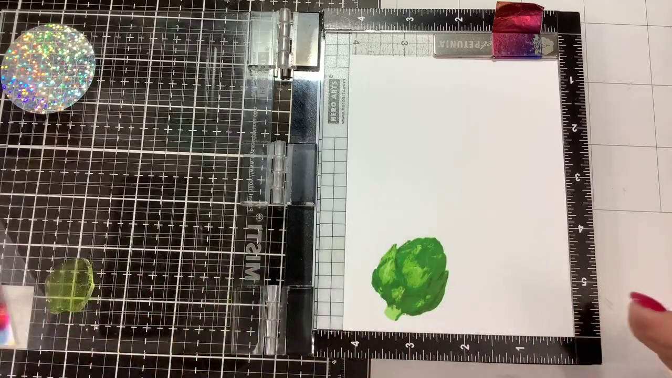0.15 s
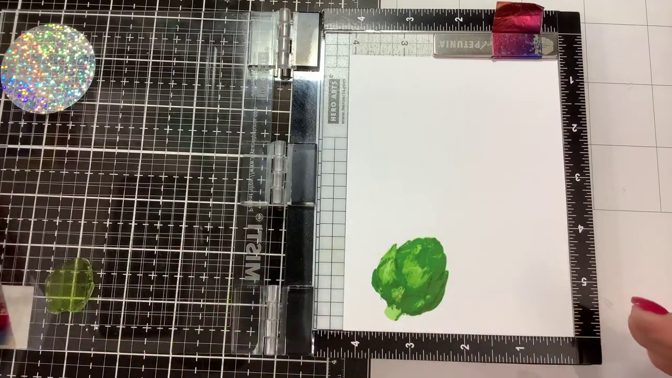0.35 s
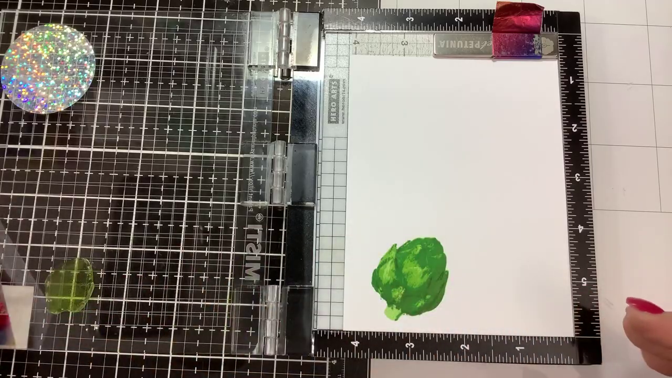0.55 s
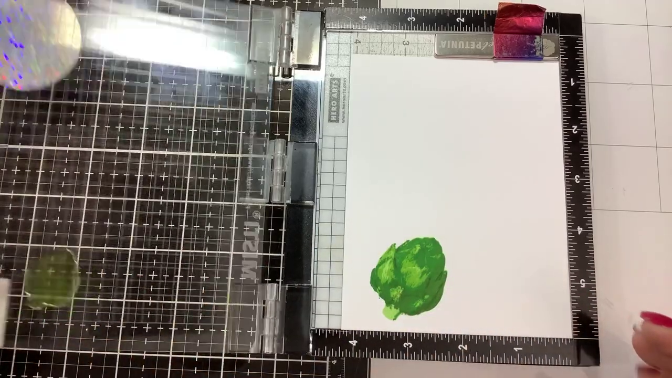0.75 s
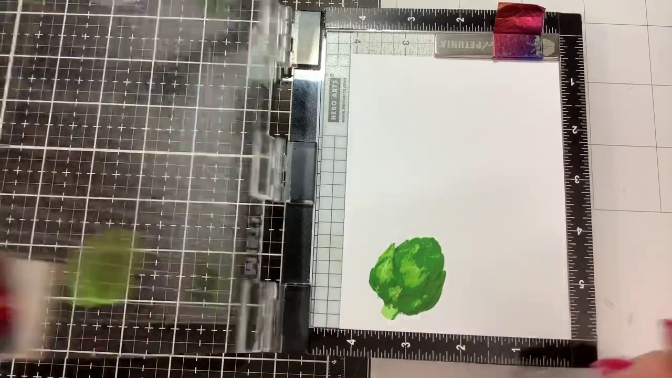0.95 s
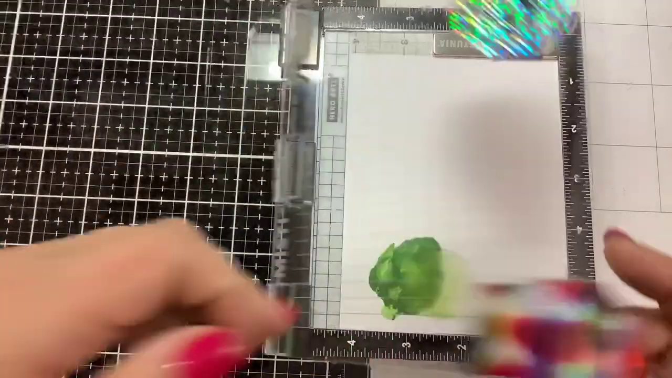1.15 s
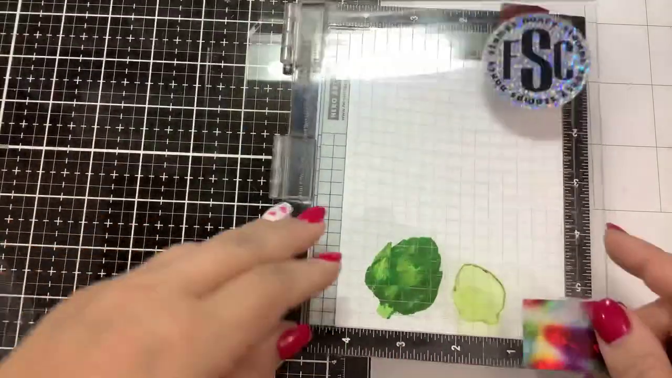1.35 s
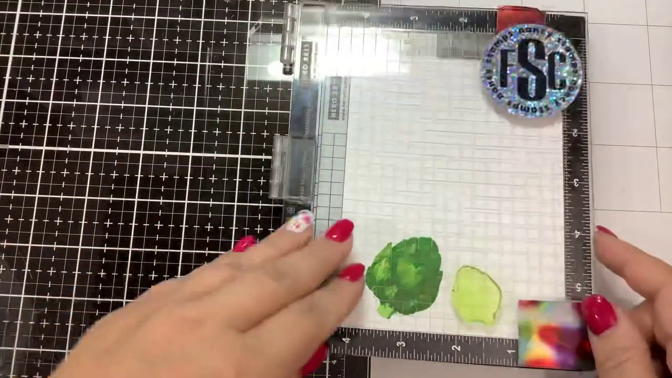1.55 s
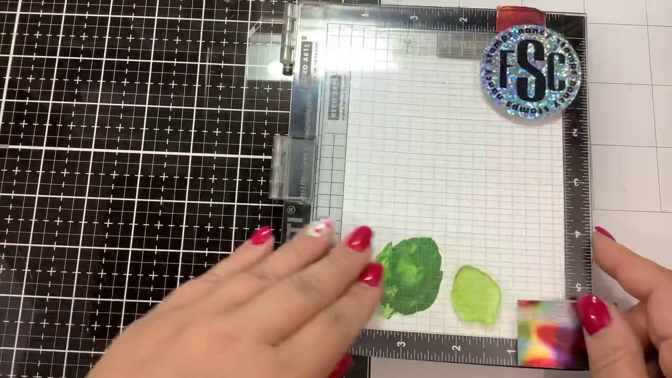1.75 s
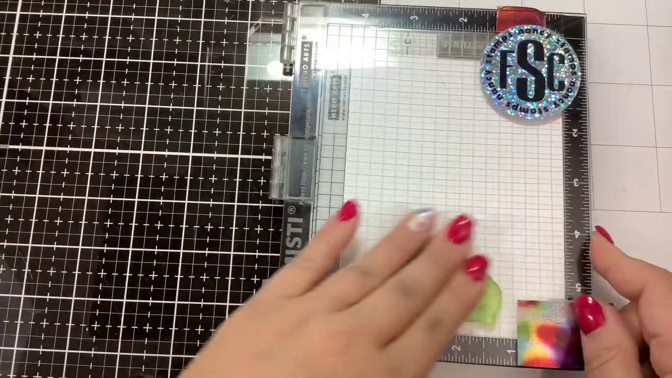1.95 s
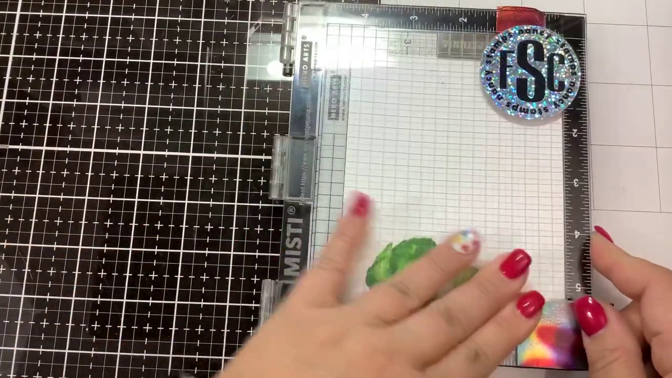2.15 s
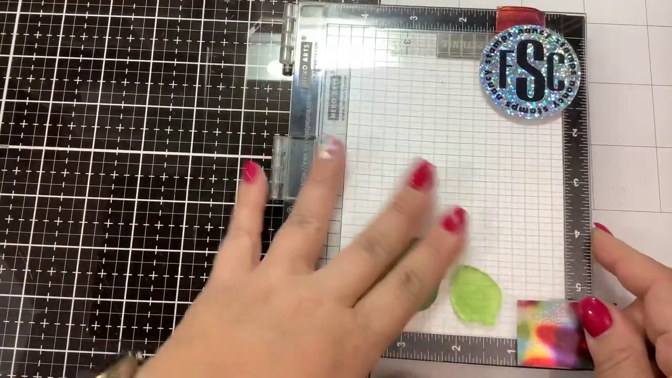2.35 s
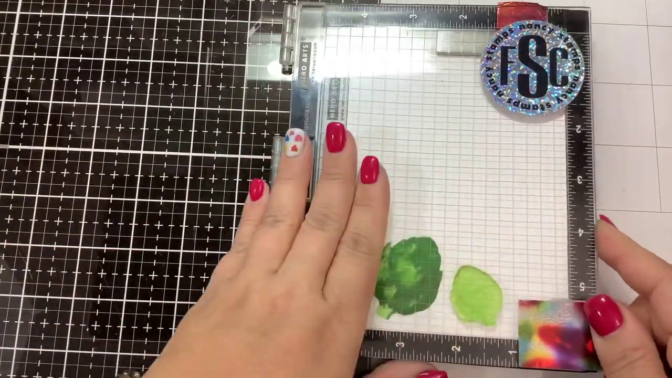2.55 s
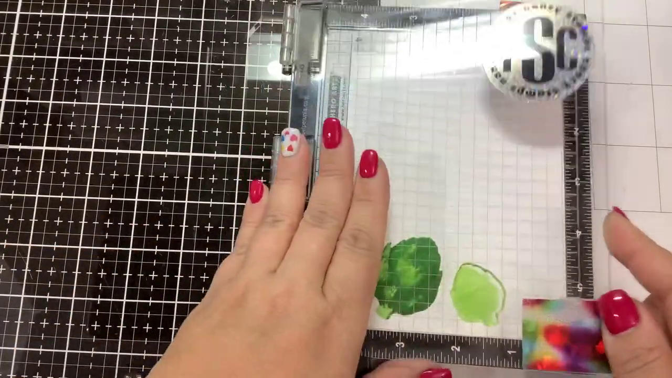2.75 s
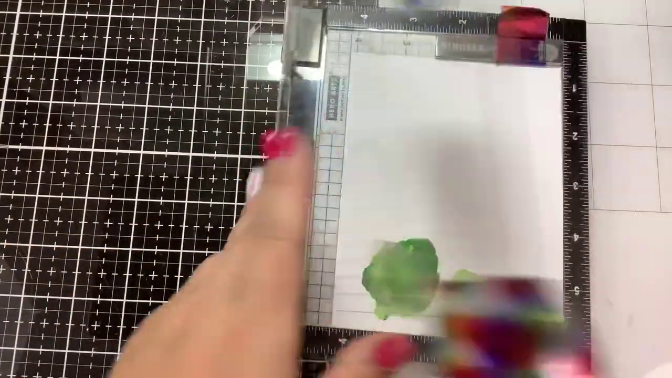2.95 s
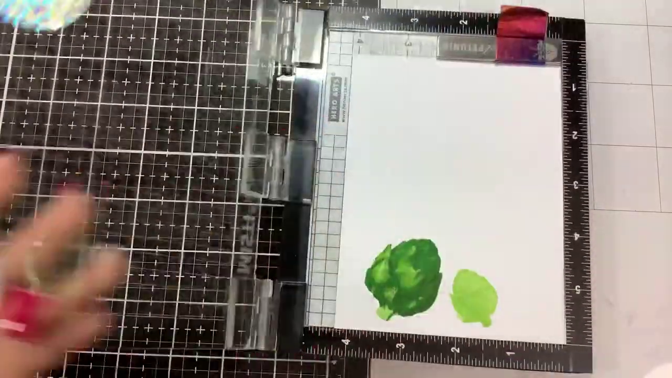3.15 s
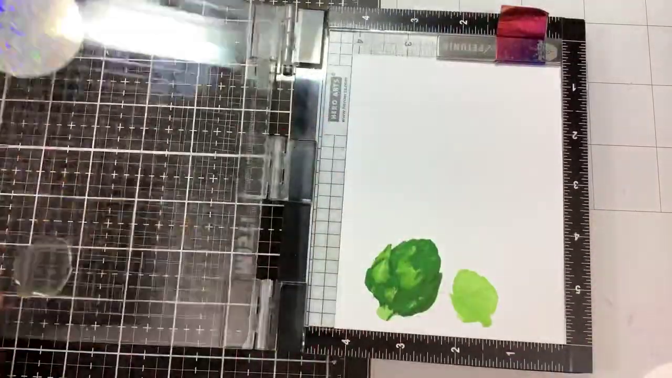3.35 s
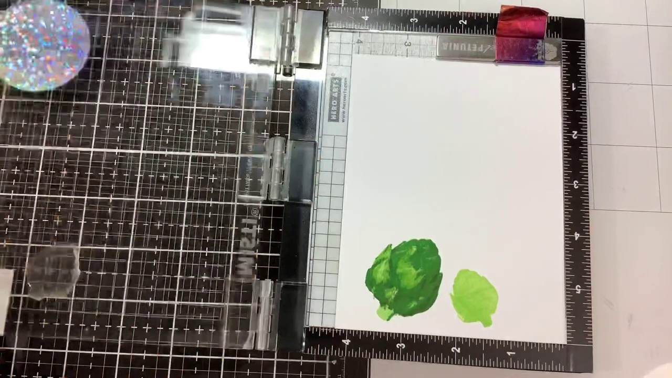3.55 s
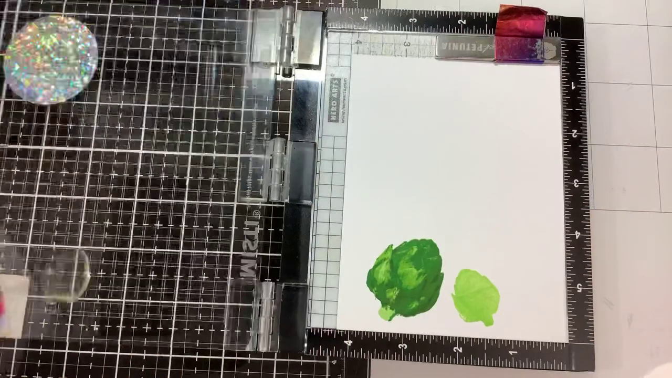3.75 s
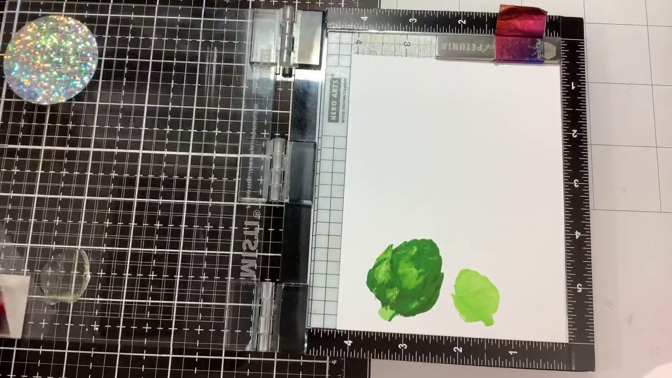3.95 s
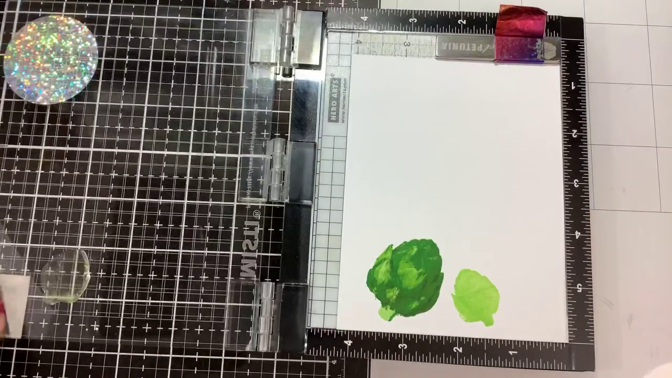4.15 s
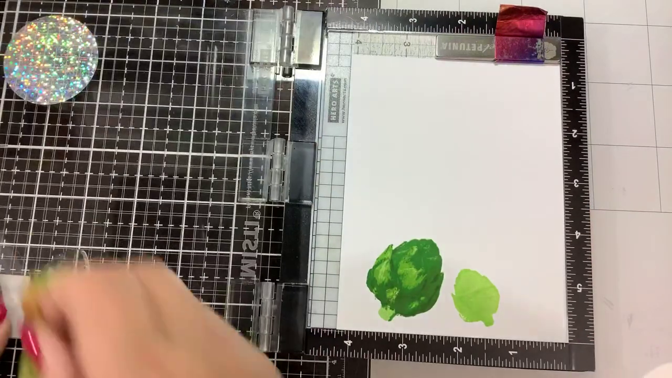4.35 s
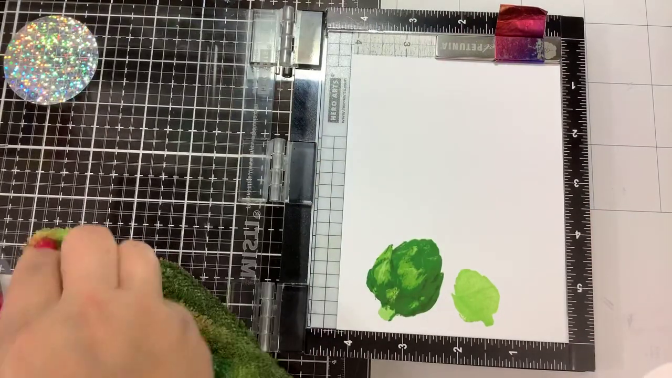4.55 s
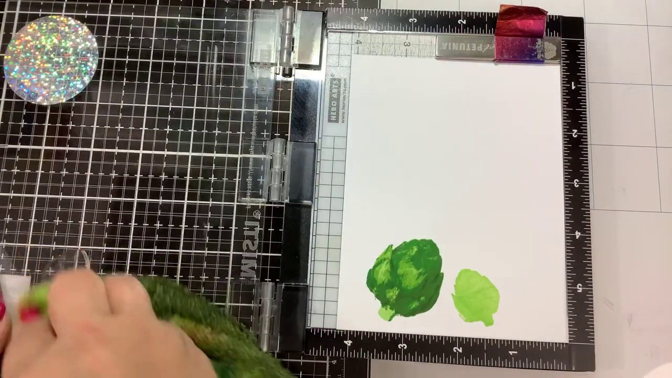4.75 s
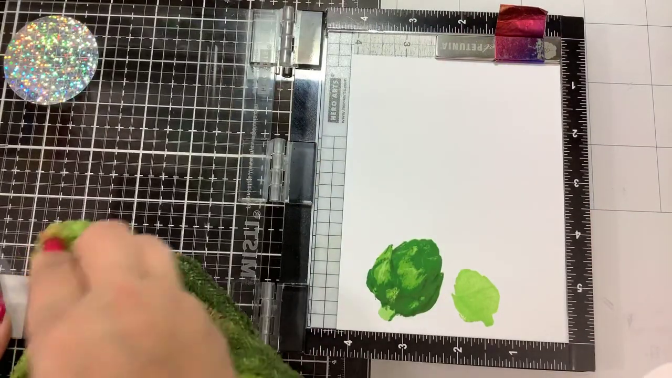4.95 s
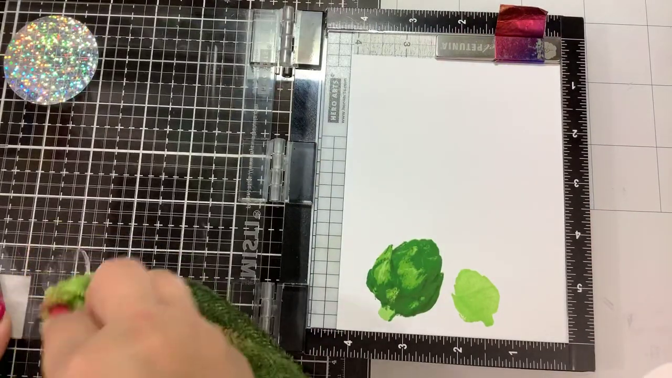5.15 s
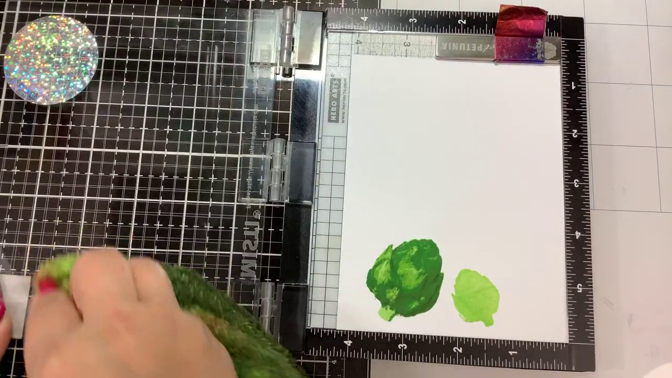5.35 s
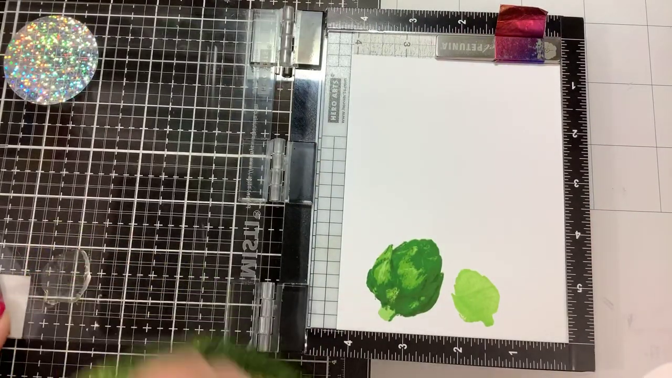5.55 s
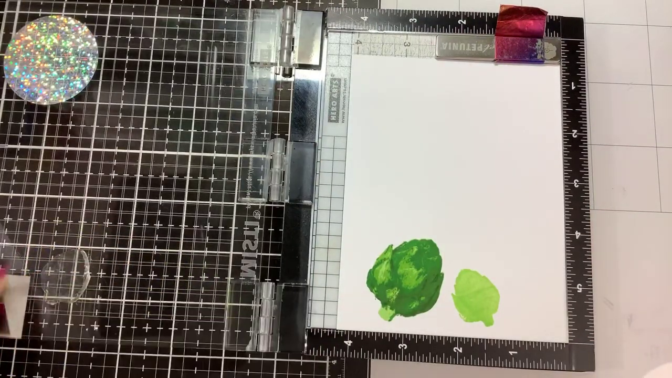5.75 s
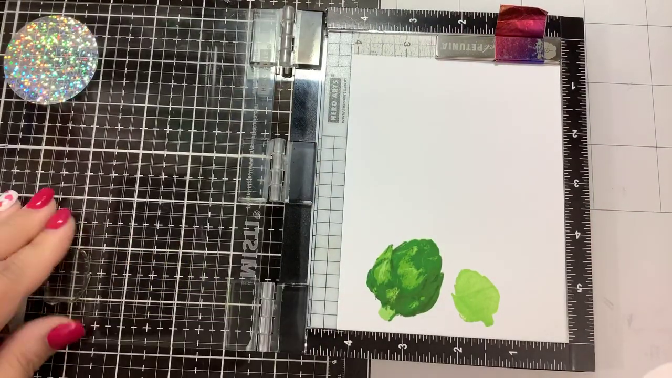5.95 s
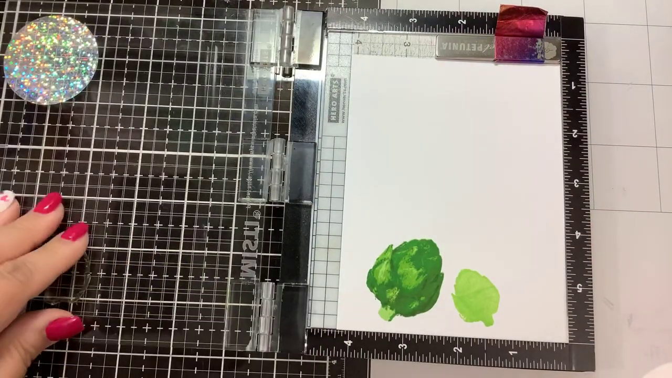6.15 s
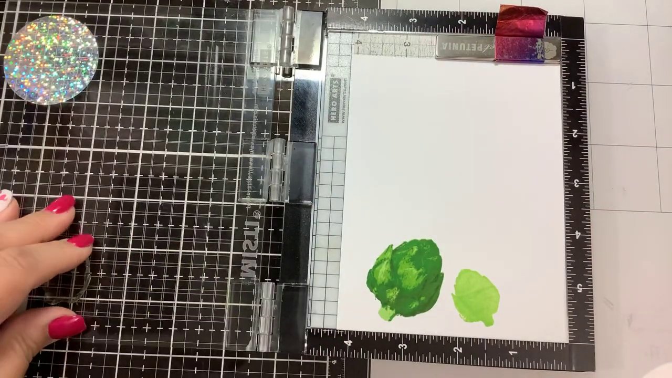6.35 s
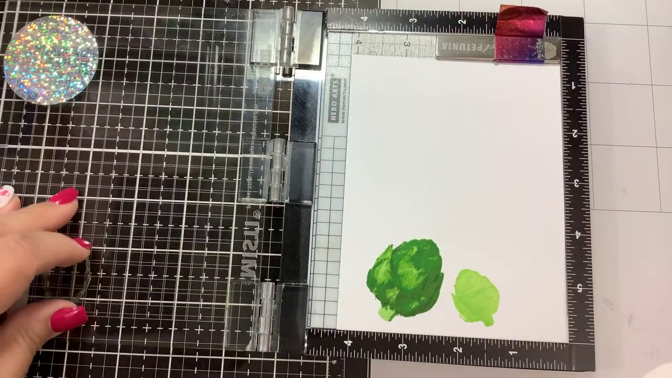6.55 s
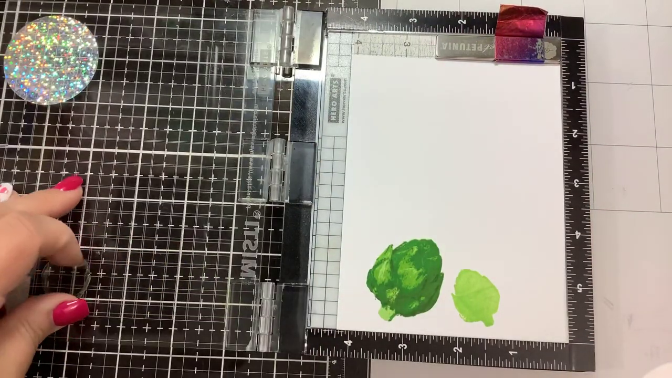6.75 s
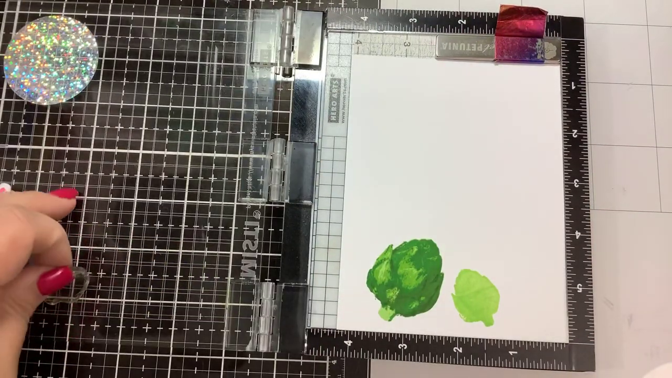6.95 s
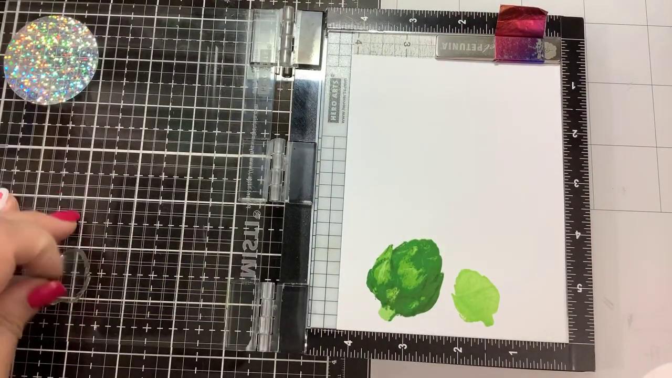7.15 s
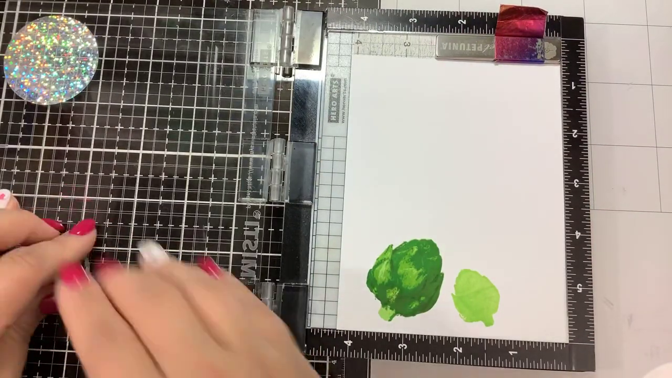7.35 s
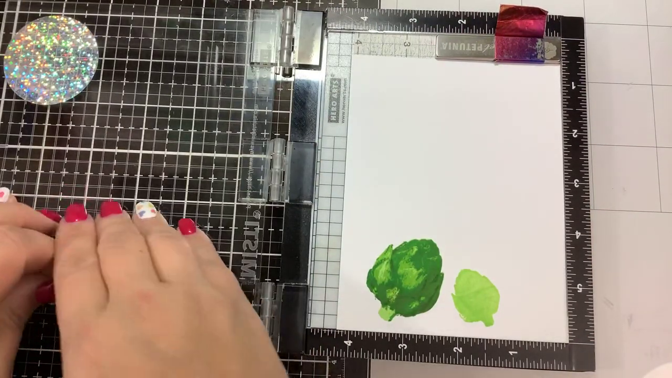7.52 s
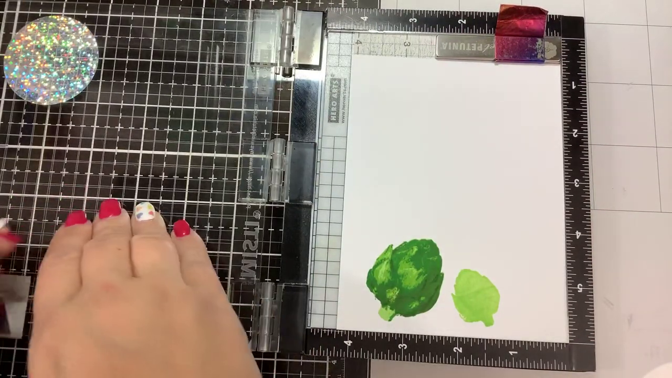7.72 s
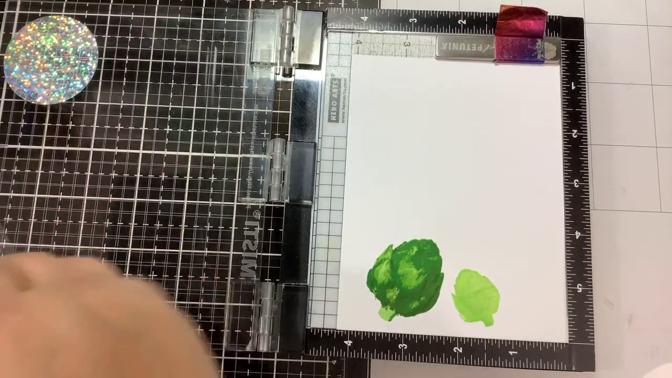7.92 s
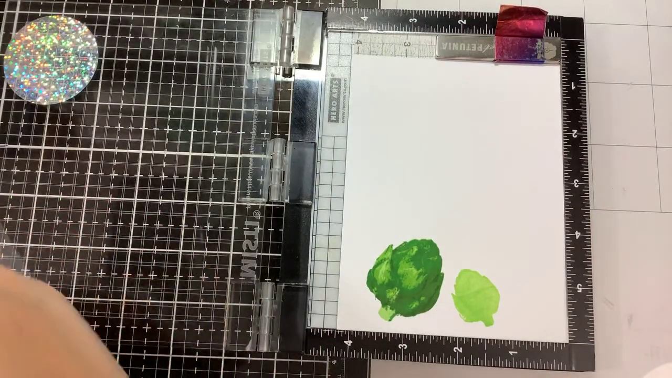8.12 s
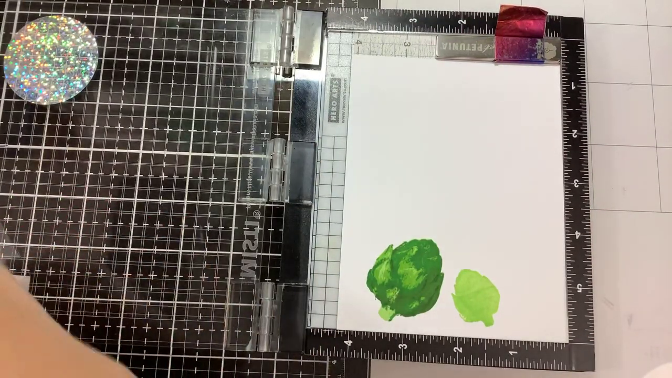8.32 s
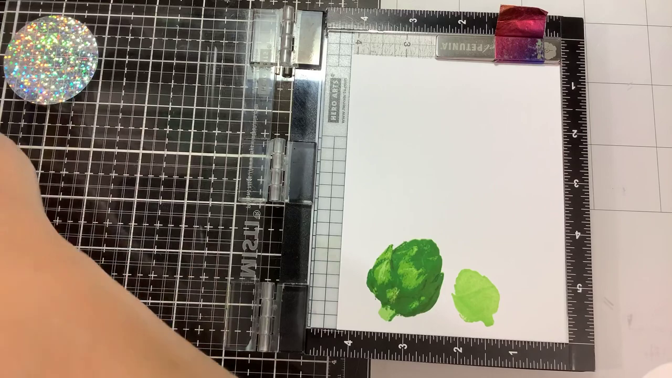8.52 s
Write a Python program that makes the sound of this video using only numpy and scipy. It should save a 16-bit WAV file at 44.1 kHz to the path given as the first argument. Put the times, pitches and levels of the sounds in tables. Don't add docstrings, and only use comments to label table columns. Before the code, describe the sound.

A small, dry room, heard very close, with faint mains hum, ventilation rumble, a weak whine and hiss throughout. At 0.1 s a plastic plate lands with a loud hard clack; a crisp snap follows at 0.35. From 0.6 to 0.95 the dry hinge pings, grates and ticks rapidly, then a bright snap with a desk thud at 1.13. Until 2.9 come soft fingertip taps, cloth rustle, a short rubbing drag near 2.1 and a duller snap at 2.56. At 3.0 the hinge squeals briefly, a sharp double snap hits at 3.15, and uneven ratcheting ticks run to a knock at 3.7. From 4 to 6 there is sparse, quiet wiping and tapping, with a small ping at 5.7. A tiny falling fingertip squeak at 6.1 leads into low desk creaks until 6.9. A woody knuckle rap at 7.03, a loud hard flick at 7.27, scattered nail taps to 7.8, then near quiet.

```python
import sys
import numpy as np
from scipy import signal
from scipy.fft import rfft, irfft
from scipy.io import wavfile
from scipy.ndimage import uniform_filter1d

SR = 44100
rng = np.random.default_rng(int(sys.argv[2]) if len(sys.argv) > 2 else 0)


def master_out(mix):
    frames = np.transpose(np.atleast_2d(mix))
    ceiling = np.clip(frames, -1, 1)
    pcm = np.round(ceiling * 32767).astype(np.int16)
    wavfile.write(sys.argv[1], SR, pcm)


def amplitude_ratio(level_db):
    exponent = np.asarray(level_db, float) / 20
    return 10 ** exponent


N = 382788


def rms_one(x):
    return x / np.sqrt(np.mean(x ** 2) + 1e-20)


def in_time(rows):
    s, *columns = np.transpose(rows)
    return [np.interp(np.arange(N) / SR, s, c) for c in columns]


def during(rows):
    first, last = rows[0][0], rows[-1][0]
    inside = np.abs(np.arange(N) / SR - (first + last) / 2) < (last - first) / 2
    return uniform_filter1d(1. * inside, size=220)


def band(x, low, high):
    return signal.sosfilt(signal.butter(2, [low, high], "band", fs=SR, output="sos"), x)


def resonate(x, hz, width):
    r = np.exp(-np.pi * width / SR)
    return signal.lfilter(np.array([1, 0, -1]) * (1 - r * r) / 2, [1, -2 * r * np.cos(2 * np.pi * hz / SR), r * r], x)


def drift(rate):
    r = np.exp(-80 * np.pi * rate / SR)
    slow = signal.lfilter([1], [1, -2 * r, r * r], rng.standard_normal(N // 40 + 2002))[2000:]
    return np.interp(np.arange(N) / 40, np.arange(len(slow)), rms_one(slow))


def coloured(spectrum):
    hz, level_db = np.transpose(spectrum)
    grid = np.maximum(np.fft.rfftfreq(N, 1 / SR), 1)
    gain = amplitude_ratio(np.interp(np.log(grid), np.log(hz), level_db))
    return rms_one(irfft(rfft(rng.standard_normal(N)) * gain, N))


def body(x, modes, ring_db):
    ringing = sum(amplitude_ratio(db) * resonate(x, hz, w) * (-1) ** k for k, (hz, w, db) in enumerate(modes))
    return x + amplitude_ratio(ring_db) * ringing


def grains(per_s, spread_db):
    sizes = amplitude_ratio(spread_db * np.minimum(rng.exponential(1, N), 4)) * rng.standard_normal(N)
    return rms_one(sizes * (rng.random(N) < per_s / SR))


# (lower edges [Hz]), (upper edges [Hz])
BAND_EDGES = [1400, 430, 4000, 8000], [4000, 1400, 8000, 16500]
CREST = [8, 5, 8]


def contacts(rows, modes, ring_db, ms=2.2, echo_db=0, click=6.54, alike=0):
    out, t = np.zeros(N + 8192), np.arange(8192) / SR
    room_t60_s, room_db = 0.09, -11
    late_t60_s, late_db = 0.23, -34
    tails = amplitude_ratio(room_db + echo_db - 60 * t / room_t60_s) + amplitude_ratio(late_db + echo_db - 60 * t / late_t60_s)
    echoes = tails * np.clip(t / 0.00073 - .5, 0, 1)
    treble_loss = amplitude_ratio(-245.5 * t)
    usual = rng.standard_normal(8192)
    for s, peak_db, dull_db, bright_db, top_db, *own_ms in rows:
        decay_ms = [ms, *own_ms][-1]
        shape = np.exp(-t * 1000 / decay_ms) * np.minimum(t / 0.00016, 1) + echoes
        struck = [(hz, w, db + 1.5 * rng.standard_normal()) for hz, w, db in modes]
        force = (alike * usual + np.sqrt(1 - alike ** 2) * rng.standard_normal(8192)) * shape
        force[8] += click
        rung = body(force, struck, ring_db)
        parts = [sign * band(rung, low, high) for sign, low, high in zip([1, -1, -1, 1], *BAND_EDGES)]
        parts[2:] = treble_loss * parts[2:]
        parts[1] = np.interp(t - 0.0012, t, parts[1], left=0)
        weights_db = [0, *(np.array([dull_db, bright_db, top_db]) + CREST)]
        at = round(s * SR)
        for db, part in zip(weights_db, parts):
            out[at:at + 8192] += amplitude_ratio(peak_db + db) * part / np.abs(part).max()
    return out[:N]


# (frequency [Hz], level [dB per Hz])
FLOOR_SPECTRUM = [(12, -19), (20, -11), (32, -7.5), (43, -1), (65, -2.5), (128, -4.5), (189, -18),
                  (265, -18.5), (297, -16.5), (440, -22), (1080, -42), (1240, -23.5), (3060, -43),
                  (15800, -26)]
# (frequency [Hz], width [Hz], level [dB rms])
MAINS_HUM = [(60.4, 11, -57), (128, 6.5, -77.5)]


def background():
    hum = 0
    for hz, width, db in MAINS_HUM:
        hum = hum + amplitude_ratio(db) * rms_one(resonate(resonate(rng.standard_normal(N), hz, width), hz, width))
    whine_hz = 295.7 + .8 * drift(1.9)
    whine = amplitude_ratio(-65 + 1.8 * drift(4)) * np.sin(2 * np.pi * np.cumsum(whine_hz) / SR)
    return amplitude_ratio(-56.5) * coloured(FLOOR_SPECTRUM) + hum + whine


def lamp():
    ticks = np.diff(np.floor(np.arange(N + 1) * 120.015 / SR))
    return amplitude_ratio(-78) * rms_one(band(ticks, 10500, 11900))


# (frequency [Hz], width [Hz], level [dB])
DESK_MODES = [(650, 110, -4), (1150, 37, 1), (1770, 130, -22), (3140, 220, -28.5)]
# (frequency [Hz], level [dB per Hz])
RUSTLE_SPECTRUM = [(880, -13.5), (1500, -46.5), (1740, 7), (2070, 0.5), (2430, 0), (15800, 0.5)]
# (time [s], motion [dB], weight on the plate [dB])
HAND_MOVES = [(0, -59.5, -58.5), (0.31, -64, -79.5), (0.58, -55, -66.5), (0.95, -66, -76),
              (1.22, -63.5, -67.5), (1.82, -62.5, -70.5), (2.13, -55, -65.5), (2.37, -60.5, -71),
              (2.67, -62, -64), (3.0, -60, -70.5), (3.76, -61, -72), (4.26, -57, -67.5), (5.12, -62.5, -70),
              (5.54, -58.5, -67), (6.2, -63.5, -71), (6.55, -67, -63), (7.0, -63.5, -68.5),
              (8.68, -63, -73.5)]
# (start [s], hold [s], level [dB])
DRAGS = [(2.03, 0.033, -53), (2.099, 0.038, -34), (2.281, 0.0033, -46), (1.884, 0.079, -60),
         (2.185, 0.055, -62), (2.503, 0.023, -62.5), (2.573, 0.047, -50), (2.679, 0.022, -54),
         (2.764, 0.031, -53.5), (4.09, 0.027, -72), (6.657, 0.11, -77)]


def rubbing():
    flicker_db = 1.5 * np.array([drift(25), drift(25), drift(12)])
    skin = rms_one(band(body(grains(4000, spread_db=2.0), DESK_MODES, ring_db=12), 450, 2500))
    rumble = rms_one(band(band(rng.standard_normal(N), 100, 250), 90, 260))
    layers = amplitude_ratio(flicker_db - 0.5) * [skin, coloured(RUSTLE_SPECTRUM), rumble]
    motion_db, weight_db = in_time(HAND_MOVES)
    rumble_db = -66.5 + 2.3 * (weight_db + 69)
    levels_db = np.array([weight_db, motion_db, rumble_db])

    grit = grains(2500, spread_db=2.5)
    drag = rms_one(resonate(resonate(grit, 590, 740), 1220, 210) + 0.047 * band(grit, 290, 4400))
    t, slope = np.arange(N) / SR, 900
    press = 0
    for s, hold, db in DRAGS:
        away = np.clip(s - t, 0, 1) + np.clip(t - s - hold, 0, 1)
        press = press + amplitude_ratio(db - slope * away)
    return np.sum(amplitude_ratio(levels_db) * layers, axis=0) + press * drag


# (time [s], peak [dB], dull band [dB], bright band [dB], top band [dB], contact [ms])
SET_DOWN_HITS = [
    (0.0808, -2, -16.5, -10, -10.5, 0.6),
    (0.0843, -10.5, -18.5, -2.5, -12.5, 1.0),
]
# (frequency [Hz], width [Hz], level [dB])
LANDING_MODES = [(620, 42, -11.5), (1040, 94, -2), (1170, 110, -0.5), (1750, 170, 4.5), (2020, 170, 4),
                 (2890, 170, 1), (3070, 150, -6), (4360, 200, -5.5), (4580, 170, -5), (6287, 500, -2)]
FADING_KNOCK = [
    (0.0002, -34, -6.5, -5, -16, 12),
]
# (frequency [Hz], width [Hz], level [dB])
FADING_KNOCK_MODES = [(631, 80, -0.5), (2170, 70, 4), (2330, 70, 0), (2390, 70, 0.5), (6013, 150, -7)]


def set_down():
    fading = contacts(FADING_KNOCK, FADING_KNOCK_MODES, ring_db=15.0, click=.1)
    return fading + contacts(SET_DOWN_HITS, LANDING_MODES, ring_db=11, echo_db=-1.5, click=11.0)


# (time [s], peak [dB], pitch [Hz], t60 [s])
DESK_THUDS = [(0.088, -33.5, 208.5, 0.076), (0.352, -48, 196, 0.059), (0.886, -48.5, 183, 0.11),
              (1.139, -40, 197.7, 0.16), (1.153, -36.5, 167.3, 0.087), (2.109, -39.5, 207, 0.085),
              (2.592, -41, 126, 0.051), (3.161, -27.5, 147.2, 0.1), (3.715, -42.5, 136.3, 0.17),
              (5.397, -41.5, 112.4, 0.037), (6.235, -54.5, 146, 0.13), (6.44, -58.5, 160.5, 0.43),
              (6.551, -55, 178.5, 0.41), (7.033, -42.5, 212, 0.1), (7.44, -47.5, 190, 0.057),
              (7.619, -41, 170.6, 0.085)]
# (time [s], peak [dB], pitch [Hz], t60 [s])
DESK_SWAYS = [
    (1.155, -38.5, 65, 0.13),
    (3.172, -46, 73.6, 0.15),
    (3.732, -40.5, 55, 0.12),
]


def thuds():
    out, t = np.zeros(N + 8192), np.arange(8192) / SR
    swell = 1 - np.exp(-t / .004)
    for s, peak_db, hz, t60 in [*DESK_THUDS, *DESK_SWAYS]:
        partials = [(1, 0.96), (1.45, 0.45), (2.3, .25)]
        swing = sum(share * np.sin(2 * np.pi * ratio * hz * t) for ratio, share in partials)
        at = round(s * SR)
        out[at:at + 8192] += amplitude_ratio(peak_db + 11.0 - 60 * t / t60) * swell * swing
    return out[:N]


# (time [s], peak at 1.4-4 kHz [dB], dull band [dB], bright band [dB], top band [dB])
MAGNET_SNAPS = [
    (0.3468, -21, -14, -6, 2),
    (1.1318, -13, -10.5, 6, -1.5),
    (1.7764, -28.5, -17, -60, -3),
    (2.5591, -20, -21.5, -22, -0.5),
    (3.1501, -15, -11, 3.5, 7.5),
    (3.1535, -17, -13, 3.5, 3),
]
# (frequency [Hz], width [Hz], level [dB])
MAGNET_MODES = [(1220, 300, -7), (4965, 400, -1), (5720, 600, 3.5), (8300, 500, -6)]


def magnet_snaps():
    return contacts(MAGNET_SNAPS, MAGNET_MODES, ring_db=3, ms=0.9, echo_db=-2.0, click=8.0)


# (time [s], peak [dB], dull band [dB], hardness [dB])
SHORT_TAPS = [(0.402, -46, -10, -5), (0.4339, -38.5, -15, -15), (1.3887, -51.5, 4.5, -10),
              (1.5229, -46, -31.5, -3), (1.5429, -36.5, -33, -21), (1.6791, -49.5, -5.5, -18),
              (1.714, -52.5, -5.5, -14.5), (1.9175, -44, -20, -2.5), (1.9894, -37.5, -8.5, -8.5),
              (2.0084, -44.5, -5, -16), (2.0682, -49, -17, -8), (2.086, -36.5, -14, -3.5),
              (2.2059, -52, -13, -3), (2.49, -47.5, -23, 1.5), (2.593, -49, -26, -6),
              (2.843, -50, -30, 1), (2.2827, -56.5, 11.5, -10), (2.363, -37.5, -12, -9),
              (2.5734, -29, -21, -14), (2.6075, -30.5, -24, -29), (2.6863, -33.5, -9, -15.5),
              (2.7294, -57, 6, -11),
              (4.1763, -34.5, -30, -31), (4.275, -55, 0, -20), (4.688, -43.5, -12, -3),
                (4.719, -51.5, -7, -15), (4.8862, -44, -11, -19), (5.2133, -44.5, -13, -25),
                (5.365, -50, -10, -1.5), (5.40, -57, -11.5, 7.5), (5.557, -51, 2.5, -3),
                (6.6315, -50.5, -4, 4), (6.84, -61, -4, 16), (6.89, -61.5, -14, -12),
                (6.946, -47.5, -18, 1), (7.356, -50.5, -22.5, -2), (7.4285, -53.5, 7, 3),
                (7.4984, -37, -32, -6.5), (7.5542, -40.5, -8, 1.5), (7.567, -31.5, -17, -3.5),
                (7.7745, -36, -28, -5), (7.783, -42, -14, -9), (8.599, -42.5, -10.5, -9.5)]
# (time [s], peak [dB], dull band [dB], hardness [dB])
DRAGGED_TAPS = [
    (7.4528, -34, -37, -4),
    (7.5885, -33, -13.5, -1),
    (7.8143, -31.5, -46, -5),
]


def finger_taps():
    def touches(rows):
        return [(s, db, dull_db, -5.5 + hard_db, 1.5 + hard_db) for s, db, dull_db, hard_db in rows]

    short = contacts(touches(SHORT_TAPS), DESK_MODES, ring_db=-6.0, ms=2.46)
    return short + contacts(touches(DRAGGED_TAPS), DESK_MODES, ring_db=-3.0, ms=6.2)


# (start [s], length [s], level [dB], brightness [dB])
BRUSH_STROKES = [(0.477, 0.1, -53, 1.5), (0.871, 0.03, -44, 0.5), (1.407, 0.058, -54.5, -1.5),
                 (1.519, 0.046, -53, 6.5), (2.33, 0.17, -60.5, -0.5), (2.55, 0.083, -56, -10),
                 (2.761, 0.08, -51.5, 0.5), (4.076, 0.059, -51, -3), (4.208, 0.049, -49, -0.5),
                 (4.37, 0.058, -61, 6), (4.489, 0.038, -58.5, -5.5), (4.515, 0.097, -70.5, -11.5),
                 (5.533, 0.082, -59.5, 0), (6.316, 0.12, -70.5, -7.5), (7.342, 0.036, -63, -4),
                 (7.628, 0.073, -62.5, 5), (5.685, 0.05, -45, -3.5), (6.077, 0.049, -66.5, -8),
                 (6.4, 0.24, -63.5, -2.5), (6.736, 0.054, -56.5, -3), (7.544, 0.093, -50, 0),
                 (7.777, 0.042, -56.5, -0.5)]


def strokes():
    grit = grains(6000, spread_db=2.0)
    low, mid, top = (rms_one(band(grit, a, b)) for a, b in [(700, 3060), (2500, 8160), (7000, 14000)])
    out = np.zeros(N)
    for s, length, level_db, bright_db in BRUSH_STROKES:
        at = slice(round(s * SR), round((s + length) * SR))
        swell = np.sin(np.pi * np.linspace(0, 1, at.stop - at.start) ** 0.93)
        tilted = amplitude_ratio(-3.5 - bright_db) * low[at] + mid[at] + amplitude_ratio(0.5 + bright_db) * top[at]
        out[at] += amplitude_ratio(level_db) * swell * tilted
    return out


UPRIGHT_SPANS = [
    [(.757,), (.93,)],
    [(3.0,), (3.33,)],
]


def upright():
    return sum(during(span) for span in UPRIGHT_SPANS)


def ratchet():
    rate_hz, depth, decay_ms = 200, .4, 1.6
    turns = np.cumsum(rate_hz * (1 + .15 * drift(30))) / SR
    jerks = np.exp(-(turns % 1) * 1000 / rate_hz / decay_ms)
    return 1 - depth + depth * rms_one(jerks)


# (frequency [Hz], width [Hz], level [dB])
HINGE_MODES = [(631, 45, 0), (1366, 177, 0.5), (1676, 210, -6), (2280, 260, 2), (3210, 290, -1.5),
               (3950, 85, -4.5), (5200, 990, -14), (7350, 125, -5), (8250, 180, -17), (11870, 1340, -3.5)]
EDGE_MODE, FLAT_LOSS_DB = 4, -12
# (frequency [Hz], width [Hz], level [dB])
LOADED_HINGE_MODES = [(2850, 80, 2), (3890, 120, -8.5), (5120, 103, -11), (5440, 90, -8),
                      (5440, 1100, -11.5)]
# (time [s], level [dB], load [dB])
GRIND_SWINGS = [
    [(.6, -72, -8), (.63, -35.5, -36), (.76, -43.5, 4), (.79, -38, 6.5), (.83, -37.5, 2.5),
     (.85, -42.5, -1), (.89, -42.5, 3), (.92, -40.5, -2), (.96, -75, -12)],
    [(3.04, -59, -7), (3.07, -41, 6.5), (3.145, -40, 3), (3.2, -31, -2), (3.3, -42.5, -4),
     (3.34, -33.5, -1.5), (3.44, -38, -5), (3.46, -72, -3)],
    [(3.495, -47, -6), (3.52, -36.5, -3), (3.57, -54, 8), (3.62, -43, -3), (3.69, -36, -3), (3.73, -48, 0),
     (3.76, -53.5, 11), (3.785, -65, 0)],
]


def grind():
    grit = grains(9000, spread_db=1.5) * ratchet()
    low = rms_one(band(body(grit, HINGE_MODES[:4], ring_db=17), 450, 2800))
    low = low + amplitude_ratio(-5.0) * rms_one(band(grit, 150, 720))
    edge_db = 23 + FLAT_LOSS_DB * (1 - upright())
    edge = amplitude_ratio(edge_db) * resonate(grit, HINGE_MODES[EDGE_MODE][0] * 1.025, 170)
    mid = rms_one(band(body(grit, LOADED_HINGE_MODES, ring_db=23) - edge, 1900, 6500))
    top = rms_one(band(body(grit, HINGE_MODES[7:], ring_db=-1), 7500, 14000))
    out = 0
    for rows in GRIND_SWINGS:
        level_db, load_db = in_time(rows)
        mix = low - amplitude_ratio(load_db) * mid + amplitude_ratio(-4 + 0.084 * load_db) * top
        out = out + during(rows) * amplitude_ratio(level_db - 12.0) * mix
    return out


# (time [s], peak [dB], hardness [dB])
SLIPS_CLOSING = [(0.602, -35.5, 3), (0.638, -27.5, -4), (0.6556, -33, -9), (0.6717, -33, -3),
                 (0.6831, -38, -5), (0.6918, -34.5, -1), (0.7064, -35, 0), (0.7235, -31, -1),
                 (0.7356, -34, -3), (0.749, -34, -3), (0.7601, -33, -3), (0.770, -41, -2),
                 (0.7762, -44, -3), (0.7825, -45, 2), (0.788, -40, -6), (0.7935, -43, -2), (0.798, -39, -5),
                 (0.9329, -34, -9.5)]
# (time [s], peak [dB], hardness [dB])
SLIPS_OPENING = [(3.2106, -38, -10), (3.2235, -41, -6), (3.307, -34, -2), (3.317, -34.5, -2),
                 (3.335, -43, 0.5), (3.346, -47, -6), (3.363, -45, -16), (3.377, -39, -16),
                 (3.386, -43, -10), (3.407, -53, 8), (3.432, -51, 5.5), (3.501, -46, -4), (3.754, -54, 7),
                 (3.2327, -39.5, -3), (3.2454, -33.5, -10), (3.262, -36, -1), (3.2796, -28.5, -6),
                 (3.295, -33, -2.5), (3.367, -45, 1), (3.382, -46, 5), (3.3962, -32.5, -7),
                 (3.4124, -37, -8), (3.4248, -31, -11), (3.4434, -33.5, -8), (3.5095, -34.5, 2),
                 (3.5162, -29.5, -14), (3.5318, -48, 9), (3.5502, -30, -20), (3.5829, -35.5, 4),
                 (3.6042, -28.5, -18), (3.6087, -37, 1.5), (3.622, -45, 3), (3.6268, -35, -20),
                 (3.632, -48, 2), (3.6434, -45, 4), (3.65, -31.5, -22), (3.662, -43.5, 6),
                 (3.671, -33.5, -8)]
# (time [s], peak [dB])
SLIP_RUN = [(3.065, -34.5), (3.0704, -36), (3.079, -35), (3.086, -39), (3.092, -40), (3.0994, -36),
            (3.107, -33), (3.113, -34), (3.121, -33), (3.125, -42), (3.132, -37), (3.140, -41),
            (3.146, -24)]
SLIPS_ALIKE = .7


def hinge_slips():
    single = [(s, db, -13.5, -0.5 + hard_db, 3 + hard_db) for s, db, hard_db in [*SLIPS_CLOSING, *SLIPS_OPENING]]
    run = [(s, db, -18, -10, -14) for s, db in SLIP_RUN]
    up = upright()
    standing = [row for row in single if up[round(row[0] * SR)] > .5]
    lying = [row for row in single if up[round(row[0] * SR)] <= .5]
    flat_modes = [(hz, w, db + FLAT_LOSS_DB * (k == EDGE_MODE)) for k, (hz, w, db) in enumerate(HINGE_MODES)]
    ticks = contacts([*standing, *run], HINGE_MODES, ring_db=18.0, ms=2.5, click=5.2, alike=SLIPS_ALIKE)
    return ticks + contacts(lying, flat_modes, ring_db=16.0, ms=2.1, click=4.1, alike=SLIPS_ALIKE)


# (time [s], peak [dB], contact [ms])
PIN_PINGS = [
    (.619, -22, 2.6),
    (0.627, -28, 4.6),
    (3.679, -29, 9.2),
    (5.696, -35.5, 9.9),
]
# (frequency [Hz], width [Hz], level [dB])
PIN_MODES = [(1654, 55, 1.5), (2404, 93, -1)]


def pin_pings():
    return contacts([(s, db, -24, -24, -16, ms) for s, db, ms in PIN_PINGS], PIN_MODES, ring_db=15.5)


# (time [s], slip rate [Hz], level [dB], upper partials relative [dB])
HINGE_SQUEAL = [
    (2.972, 965, -53.5, -3),
    (2.988, 969, -50.5, -6),
    (2.997, 860, -50.5, 0),
    (3.01, 819, -49.5, 4),
    (3.025, 778, -48, 8),
    (3.045, 765, -45.5, 7),
    (3.066, 766, -43, 6),
]


def squeal():
    hz, level_db, load_db = in_time(HINGE_SQUEAL)
    turns = np.cumsum(hz * (1 + .010 * drift(150))) / SR
    pulses = np.diff(np.floor(turns), prepend=0) * amplitude_ratio(2.5 * rng.standard_normal(N) + 2 * drift(60))
    low = rms_one(band(pulses, 700, 2000))
    rung = body(pulses, HINGE_MODES[4:6], ring_db=6)
    high = rms_one(band(band(rung, 2200, 5200), 2100, 5300))
    return amplitude_ratio(level_db - 7.0) * during(HINGE_SQUEAL) * (low - amplitude_ratio(load_db) * high)


# (time [s], peak [dB], dull band [dB], bright band [dB], top band [dB])
PLATE_KNOCKS = [
    (3.71, -28, -3, 7.1, 11.7),
    (7.6116, -40.5, 6, 15, 12),
]
# (frequency [Hz], width [Hz], level [dB])
PLATE_MODES = [(620, 39, -5.5), (1100, 190, -7), (1660, 210, -1.5), (2040, 180, 2.5), (2880, 280, 3),
               (4660, 310, -3), (6900, 300, -27)]


def plate_knocks():
    return contacts(PLATE_KNOCKS, PLATE_MODES, ring_db=9, ms=1.6, echo_db=2.0)


# (time [s], pitch [Hz], level [dB])
FINGER_SQUEAK = [
    (6.085, 903, -69.5),
    (6.095, 884, -66),
    (6.12, 704, -58.5),
    (6.15, 650, -64),
]


def squeak():
    hz, level_db = in_time(FINGER_SQUEAK)
    phase = 2 * np.pi * np.cumsum(hz * (1 + .025 * drift(150))) / SR
    rough = 1 + 5 * band(rng.standard_normal(N), 60, 400)
    tone = np.sin(phase) + 0.17 * np.sin(2 * phase) + .15 * np.sin(3 * phase)
    return during(FINGER_SQUEAK) * amplitude_ratio(level_db + 6.5 + 2 * drift(66)) * rough * tone


# (time [s], peak [dB], upper band [dB])
DESK_CREAKS = [(6.23, -52, -14), (6.376, -59.5, -6), (6.392, -65, -14), (6.41, -68, -14), (6.615, -66, -15),
               (6.682, -60, -11), (6.70, -63.5, -13), (6.718, -60, -9.5), (6.785, -48, -21),
               (6.356, -50.5, -10), (6.439, -52, -32), (6.462, -50, -18), (6.486, -48.5, -9),
               (6.513, -47.5, -27), (6.535, -43.5, -20), (6.56, -44, -11), (6.636, -41.5, -14),
               (6.746, -53.5, -10.5), (6.765, -52, -26), (6.806, -47, -11), (6.84, -46.5, -33),
               (6.946, -49, -26)]
# (frequency [Hz], width [Hz], level [dB])
DESK_CREAK_MODES = [(620, 112, 10), (797, 135, 4), (1070, 90, -4.5), (1420, 110, -8), (1770, 170, -11)]


def desk_creaks():
    rows = [(s, db + up_db + 8.5, -up_db - 11.0, -16, -22) for s, db, up_db in DESK_CREAKS]
    return contacts(rows, DESK_CREAK_MODES, ring_db=23.0, ms=4.6, echo_db=-15.0, alike=SLIPS_ALIKE)


# (time [s], peak [dB], dull band [dB], bright band [dB], top band [dB])
KNUCKLE_RAPS = [
    (7.0274, -21, -8.5, -38, -45),
    (7.0343, -33.5, -1, -35, -45),
    (7.9, -54, -15, -25, -25),
]
# (frequency [Hz], width [Hz], level [dB])
KNUCKLE_MODES = [(636, 52, -2), (1030, 80, -5), (1360, 160, 1), (1650, 220, 1.5), (2020, 260, 7),
                 (2750, 180, -13)]


def knuckle_raps():
    return contacts(KNUCKLE_RAPS, KNUCKLE_MODES, ring_db=19, ms=0.61, echo_db=-7.5, click=9.0)


# (time [s], peak [dB], dull band [dB], bright band [dB], top band [dB])
NAIL_FLICK = [
    (7.2662, -10.5, -35, -5, 0),
]
# (frequency [Hz], width [Hz], level [dB])
STAMP_MODES = [(1980, 190, 4.5), (2980, 300, 5), (4100, 170, -6), (5850, 500, 2.5), (7420, 400, -6),
               (9150, 400, -5)]


def nail_flick():
    return contacts(NAIL_FLICK, STAMP_MODES, ring_db=10, ms=0.8, echo_db=-4.5, click=8.3)


def scene():
    room = background() + lamp()
    friction = rubbing() + strokes() + grind() + squeal() + squeak()
    hinge = hinge_slips() + pin_pings()
    hits = set_down() + magnet_snaps() + finger_taps() + plate_knocks() + knuckle_raps() + nail_flick()
    desk = thuds() + desk_creaks()
    return (room + friction + hinge + hits + desk)[None]


def band_limit(x):
    return signal.sosfilt(signal.butter(12, 16820, fs=SR, output="sos"), x)


def record(dry):
    rounded = 1.8 * np.tanh(dry / 1.8)
    rolled = signal.sosfilt(signal.ellip(12, .5, 40, 15730, fs=SR, output="sos"), rounded)
    return band_limit(0.83 * rolled)


dry = scene()
out = record(dry)
master_out(out)
```